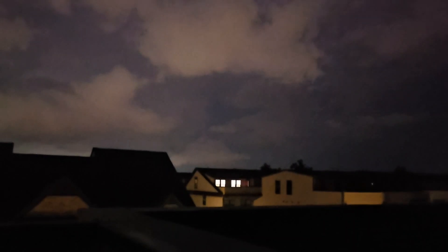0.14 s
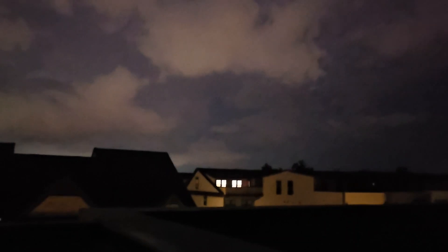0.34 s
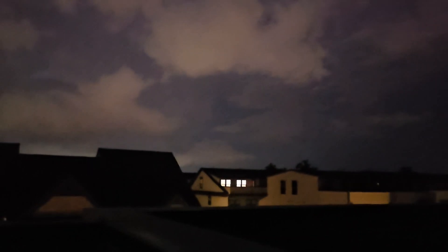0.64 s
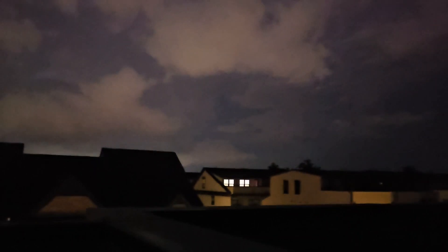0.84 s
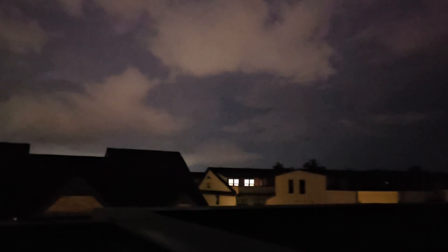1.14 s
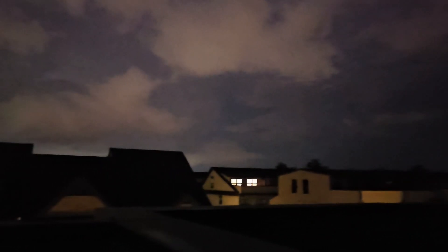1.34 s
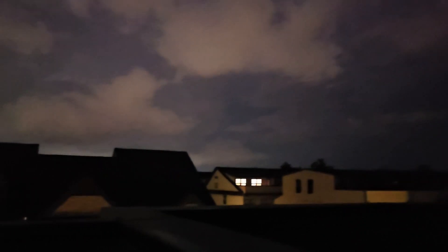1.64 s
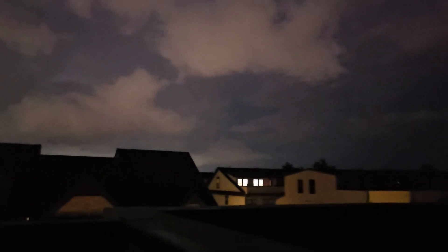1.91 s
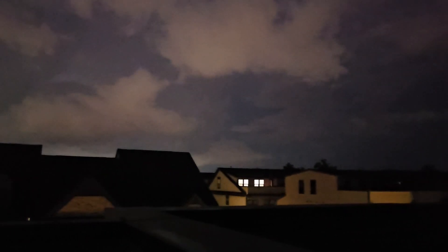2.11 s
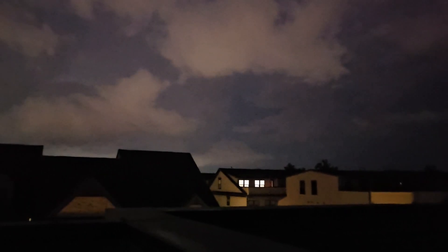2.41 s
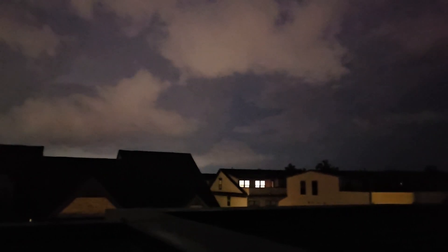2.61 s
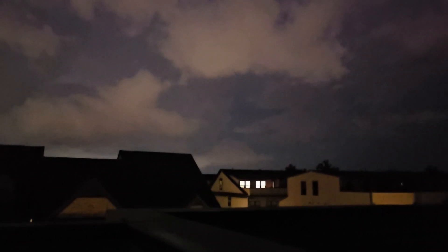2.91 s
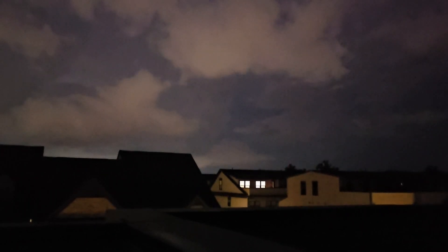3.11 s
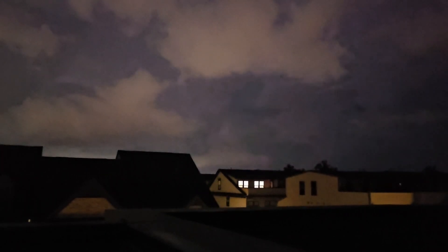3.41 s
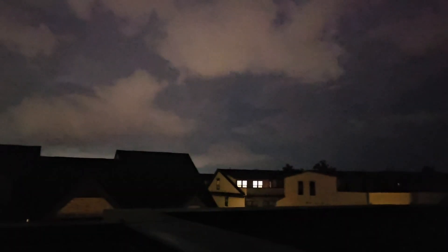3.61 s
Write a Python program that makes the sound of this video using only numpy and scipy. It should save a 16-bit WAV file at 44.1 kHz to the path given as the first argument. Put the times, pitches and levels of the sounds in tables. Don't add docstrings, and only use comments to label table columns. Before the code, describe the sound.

Dry, buzzing katydid strokes come in bursts at the start, middle and end, outdoors at a town's edge. Low thunder, motor hum and faint crickets continue beneath; a hissy stereo microphone catches a tiny snap.

```python
import sys
import numpy as np
from scipy import signal
from scipy.io import wavfile

SR = 44100
rng = np.random.default_rng(int(sys.argv[2]) if len(sys.argv) > 2 else 0)


def generate_wav(sig):
    pcm = np.round(np.clip(np.atleast_2d(sig).T, -1, 1) * 32767).astype(np.int16)
    wavfile.write(sys.argv[1], SR, pcm)


def volts_from_db(level):
    exponent = np.asarray(level, float) / 20
    return 10 ** exponent


N = 165375


def rms_one(x):
    return x / np.sqrt(np.mean(x ** 2) + 1e-20)


def in_time(rows):
    return np.interp(np.arange(N) / SR, *np.transpose(rows))


def at_hz(points, hz):
    points_hz, values = np.transpose(points)
    return np.interp(np.log(hz), np.log(points_hz), values)


def drift(rate_hz):
    r = np.exp(-80 * np.pi * rate_hz / SR)
    noise = rng.standard_normal(N // 40 + 2002)
    slow = signal.lfilter([1], [1, -2 * r, r * r], noise)[2000:]
    return np.interp(np.arange(N) / 40, np.arange(len(slow)), rms_one(slow))


def resonate(x, hz, width_hz):
    r = np.exp(-np.pi * width_hz / SR)
    poles = [1, -2 * r * np.cos(2 * np.pi * hz / SR), r * r]
    return signal.lfilter([(1 - r * r) / 2, 0, (r * r - 1) / 2], poles, x + 1e-18)


def ring_twice(x, hz, width_hz):
    return resonate(resonate(x, hz, width_hz), hz, 2 * width_hz)


def sides(pan_db):
    return volts_from_db(np.array([[pan_db / 2], [-pan_db / 2]]))


def scatter(voice, t60_s):
    tail_s = np.arange(SR // 2) / SR
    echo = rng.standard_normal((2, len(tail_s))) * volts_from_db(-60 * tail_s / t60_s) * (tail_s > .001)
    echo = echo / np.sqrt(np.sum(echo ** 2, axis=1, keepdims=True))
    return signal.fftconvolve(voice, echo, axes=1)[:, :N]


def banded_noise(spectrum, patchy_db, rate_hz, per_octave=4):
    # f/Hz, correlation
    likeness = [(60, 0.98), (150, 1), (380, 0.62), (950, -0.17), (2380, 0.16), (5980, -0.19),
                (15000, 0.031)]
    # f/Hz, difference/dB
    balance = [(60, 2.5), (180, 1.0), (550, 1.0), (1650, 0.5), (4970, -0.5), (15000, 4)]
    out, run_in = 0, SR // 2
    white = rng.standard_normal((2, 2, N + run_in))
    bottom_hz, top_hz = spectrum[0][0], spectrum[-1][0]
    edges_hz = np.geomspace(bottom_hz, top_hz, int(per_octave * np.log2(top_hz / bottom_hz)) + 2)
    for k, (low_hz, high_hz) in enumerate(zip(edges_hz, edges_hz[1:])):
        band = signal.butter(2, [low_hz, high_hz], "band", fs=SR, output="sos")
        mid, side = signal.sosfilt(band, white[k % 2])[:, run_in:]
        hz = np.sqrt(low_hz * high_hz)
        alike = np.clip(at_hz(likeness, hz), -1, 1)
        gain = volts_from_db(at_hz(spectrum, hz) + patchy_db * drift(rate_hz)) * sides(at_hz(balance, hz))
        out = out + gain * (np.sqrt(1 + alike) * mid + np.sqrt(1 - alike) * side * [[1], [-1]])
    return rms_one(out)


def insect(strokes, stroke_s, wing, teeth_per_s, split_hz):
    # t/s, left lag/s
    left_lag = [(.6, .00003), (1.2, 0)]
    rise_share, fall_share = 0.59, 0.36
    t = np.arange(N) / SR
    phase = np.cumsum(teeth_per_s / SR * np.exp(.45 * drift(300)))
    teeth = np.diff(np.floor(phase), prepend=0) * volts_from_db(2 * rng.standard_normal(N))

    low, middle, top = np.zeros((3, 2, N))
    for start_s, level_db, pan_db, middle_db, top_db in strokes:
        u = (t - start_s) / stroke_s
        gain = volts_from_db(level_db + 2.5) * sides(pan_db)
        rise = (u / rise_share).clip(0) ** 0.78
        fall = np.clip((1 - u) / fall_share, 0, 1) * (u > 0)
        lead_in = volts_from_db(-16.5) * (u < rise_share) * (t > start_s - 0.034)
        swell = np.minimum(rise, fall) + lead_in
        low += gain * swell
        caught = gain * (swell + 0.42 * fall * np.clip(1 - u / rise_share, 0, 1))
        middle += volts_from_db(middle_db) * caught
        top += volts_from_db(top_db) * caught

    voice, even = 0, 0
    for k, (hz, width_hz, mode_db, pan_db) in enumerate(wing):
        stroke = (low, middle, top)[np.searchsorted(split_hz, hz)]
        gain = (-1) ** k * volts_from_db(mode_db) / np.sqrt(width_hz)
        struck = teeth * volts_from_db(1.6 * drift(22)) * stroke
        voice = voice + gain * sides(pan_db) * ring_twice(struck, hz, width_hz)
        even = even + gain * ring_twice(teeth, hz, width_hz)
    voice = voice / np.std(even)

    direct = np.array([np.interp(t - in_time(left_lag), t, voice[0]), voice[1]]) * sides(2)
    leaves = volts_from_db(-5) * scatter(voice, t60_s=.05) * sides(2)
    trees = volts_from_db(-13) * scatter(voice, t60_s=0.66)
    return direct + leaves + trees


def katydid():
    # start t/s, level/dB, left-right/dB, middle/dB, top/dB
    near_strokes = [(-.038, -65, -1, 4, 4), (.053, -68.5, -2, 7.5, 2), (.149, -65, -2, 1.5, -1),
                    (.245, -66, -2, 2.5, -3), (1.386, -66.5, -4.5, 0, 3), (1.48, -67, -5, -0.5, 1),
                    (1.572, -67.5, -5, 0.5, 0), (1.666, -67.5, -3, -1, -1.5), (1.76, -67, -3.5, 0, -3),
                    (3.046, -69.5, -4, 0, -1), (3.136, -69.5, -4, 0.5, -2), (3.224, -68.5, -3, 4, -3),
                    (3.318, -69.5, -3, 4, -2), (3.412, -69.5, -4, 4, 1)]
    # start t/s, level/dB, left-right/dB, middle/dB, top/dB
    far_strokes = [
        (.31, -85, -2, -8, -9),
        (.35, -78.5, -3, -8, -12),
        (.39, -78.5, 5, -6, -8),
        (.43, -79.5, -3, -4, -8),
        (.47, -83, -5, -7, -12),
    ]
    # f/Hz, width/Hz, level/dB, left-right/dB
    katydid_wing = [(2300, 460, 2.5, 2), (3123, 165, 1.5, -6), (3440, 110, -8, -5.5), (3685, 81, -9, -1.5),
                    (4010, 200, -2.5, -8), (4480, 250, -5, -1.5), (4800, 140, -4.5, -1), (4980, 97, 1, 2),
                    (5565, 270, -3.5, -3), (6130, 150, -5, 2), (6550, 180, -13.5, -4.5),
                    (7030, 130, -15, 0), (7560, 150, -16.5, -1), (8220, 500, -21.5, -6)]
    rasp = insect(near_strokes + far_strokes, stroke_s=0.069, wing=katydid_wing, teeth_per_s=600,
                  split_hz=(5300, 6350))
    air_loss = signal.butter(4, 7560, fs=SR, output="sos")
    return signal.sosfilt(air_loss, volts_from_db(-0.74) * rasp)


def high_insect():
    # start t/s, level/dB, left-right/dB, middle/dB, top/dB
    high_strokes = [
        (3.565, -94.5, -8, -6, 4),
        (3.605, -99, -3, 0, -5),
        (3.632, -85, -5, -4, 2),
        (3.67, -91, -7, -1, -10),
        (3.695, -94, 0, -4, 1),
        (3.716, -83, -3, 0, 3),
    ]
    # f/Hz, width/Hz, level/dB, left-right/dB
    high_wing = [(7400, 700, -10, 0), (8200, 610, -1, -7), (8760, 600, -7, -7), (10100, 360, -5, -6),
                 (11600, 1000, -12, 0)]
    return insect(high_strokes, stroke_s=0.046, wing=high_wing, teeth_per_s=280, split_hz=(5300, 9500))


def thunder():
    # t/s, level/dB
    roll = [(0.0, -54.5), (0.4, -58.5), (0.49, -54), (0.72, -58.5), (0.78, -54), (1.82, -56), (1.88, -44.5),
            (1.92, -62.5), (1.98, -46), (2.09, -43.5), (2.11, -41), (2.19, -50), (2.23, -44.5),
            (2.89, -49.5), (3.05, -45), (3.38, -49.5), (3.46, -42.5), (3.75, -53)]
    # f/Hz, density/dB per Hz
    roll_colour = [(16, -30.5), (27, -3), (38, 2.5), (50, -9.5), (70, -2.5), (102, -1.5), (178, -4),
                   (216, -17), (300, -22), (390, -48.5), (660, -120)]
    # f/Hz, width/Hz, level/dB
    street_booms = [(57.14, 3, -3.5), (102.53, 6, -3.5), (136.46, 3.4, -10)]
    noise = rng.standard_normal(N + SR)
    booms = 0
    for hz, width_hz, boom_db in street_booms:
        boom = resonate(resonate(noise, hz, width_hz), hz, 3 * width_hz)[SR:]
        booms = booms + volts_from_db(boom_db) * rms_one(boom)
    broad = banded_noise(roll_colour, patchy_db=1.0, rate_hz=3.5)
    return volts_from_db(in_time(roll)) * (broad + volts_from_db(-2.5) * booms)


def snap():
    # f/Hz, width/Hz, level/dB
    snap_modes = [(4030, 390, 0), (5250, 350, -2), (7500, 200, -10), (8100, 300, -12), (11800, 700, -24),
                  (14900, 830, -20)]
    snap_s, snap_db = 2.2921, -71.5
    click = np.zeros((2, N))
    click[:, int(snap_s * SR)] = volts_from_db(snap_db)
    click[:, int((snap_s + .0007) * SR)] = volts_from_db(snap_db + 1.0) * np.array([-1, 1])
    out = 0
    for hz, width_hz, mode_db in snap_modes:
        ringing = resonate(resonate(click, hz, 2 * width_hz), hz, 2 * width_hz)
        out = out + volts_from_db(mode_db) * ringing * SR / width_hz
    return out


def far_knock():
    knock_hz, knock_width_hz = 1350, 600
    knock = np.zeros((2, N))
    knock[:, int(.764 * SR)] = volts_from_db(-69) * SR / knock_width_hz
    return resonate(resonate(knock, knock_hz, knock_width_hz), knock_hz, knock_width_hz)


def compressor():
    # multiple of rotation, level/dB rms
    hum_partials = [(3, -68), (4, -69), (5, -70.5), (8, -84.5), (18, -102), (21, -87), (35, -88), (36, -81),
                    (37, -87.5)]
    turn = 2 * np.pi * np.cumsum(59.12 * (1 + 0.001 * drift(1.28))) / SR
    out = 0
    for k, partial_db in hum_partials:
        phase = rng.uniform(0, 2 * np.pi) + np.array([[0], [k * 0.047]])
        out = out + volts_from_db(partial_db + 3.5 + 2.6 * drift(4.0)) * np.sin(k * turn + phase)
    return out


def engine_drone():
    # t/s, level/dB
    drone_level = [(0.0, -66), (0.16, -50), (0.87, -50), (0.93, -57.5), (1.84, -56), (2.12, -41),
                   (2.16, -59), (2.31, -51), (2.36, -73), (2.42, -36.5), (2.46, -58.5), (3.75, -51)]
    drone_hz, drone_width_hz = 42.3, 11
    noise = rng.standard_normal(N + SR)
    drone = resonate(resonate(noise, drone_hz, drone_width_hz), drone_hz, drone_width_hz)[SR:]
    return volts_from_db(in_time(drone_level) + 0.5) * rms_one(drone)


def chorus():
    # f/Hz, width/Hz, level/dB rms
    cricket_bands = [(2056, 260, -75), (3206, 97, -84.5), (3890, 170, -85), (4880, 190, -88.5),
                     (6470, 150, -95)]
    out = 0
    for hz, width_hz, band_db in cricket_bands:
        noise = rng.standard_normal((2, N))
        band = rms_one(resonate(resonate(noise, hz, width_hz), hz, width_hz))
        out = out + volts_from_db(band_db + 2 * drift(14)) * band
    return out


def town():
    # f/Hz, density/dB per Hz
    town_colour = [(120, -46.5), (200, -4), (243, -1), (323, -16.5), (399, -6), (441, -28.5), (475, -16),
                   (937, -19.5), (1800, -22.5), (2340, -58.5), (3960, -120)]
    return volts_from_db(-60) * banded_noise(town_colour, patchy_db=1.88, rate_hz=3.0)


def night_air():
    # f/Hz, density/dB per Hz
    air_colour = [(940, -32), (1600, -9.5), (2170, -4.5), (2520, -7.5), (4500, -17), (4870, -16),
                  (5710, -30.5), (6410, -26), (9000, -38), (11700, -60.5), (19800, -120)]
    return volts_from_db(-71) * banded_noise(air_colour, patchy_db=1.45, rate_hz=5.1, per_octave=5)


def mic_hiss():
    # f/Hz, density/dB per Hz
    hiss_colour = [(8500, -23.5), (9500, -19), (10750, -9.5), (11050, -3.5), (13000, -5.5), (15000, -1),
                   (17000, -2.5)]
    return volts_from_db(-89.5) * banded_noise(hiss_colour, patchy_db=1.0, rate_hz=6.9, per_octave=16)


def scene():
    insects = katydid() + high_insect() + chorus()
    machines = compressor() + engine_drone()
    background = town() + night_air() + mic_hiss()
    return insects + thunder() + snap() + far_knock() + machines + background


def top_cut(x):
    return signal.sosfilt(signal.butter(12, 15650, fs=SR, output="sos"), x)


def record(dry):
    low_pass = signal.ellip(12, .5, 60, 15600, fs=SR, output="sos")
    return top_cut(signal.sosfilt(low_pass, dry))


dry = scene()
out = record(dry)
generate_wav(out)
```